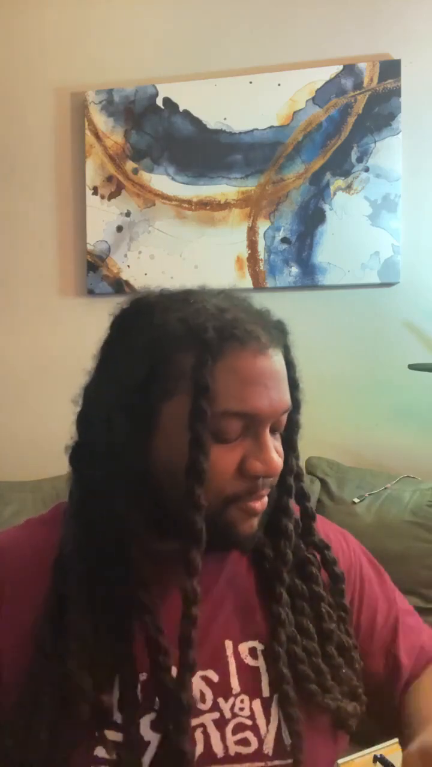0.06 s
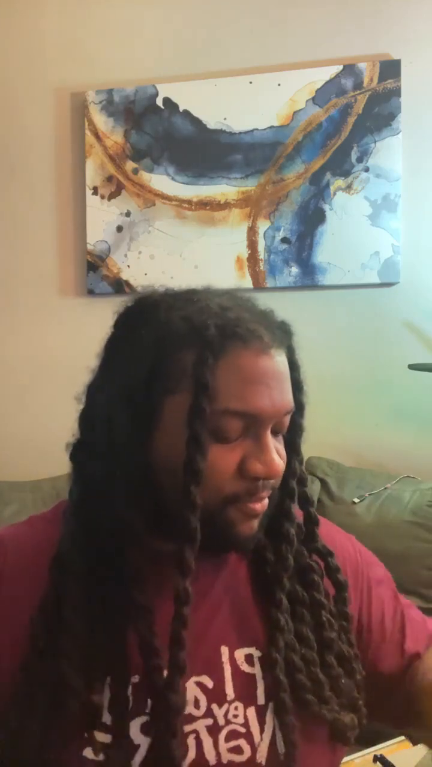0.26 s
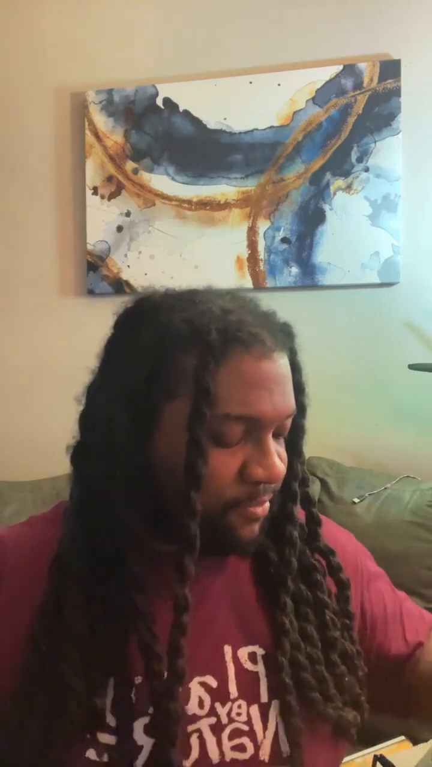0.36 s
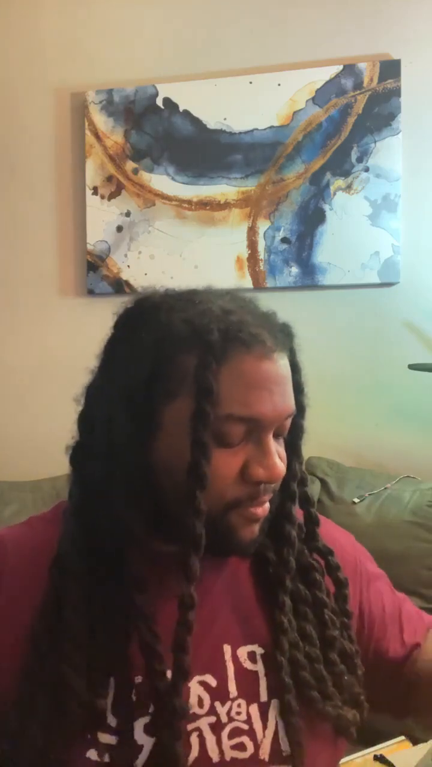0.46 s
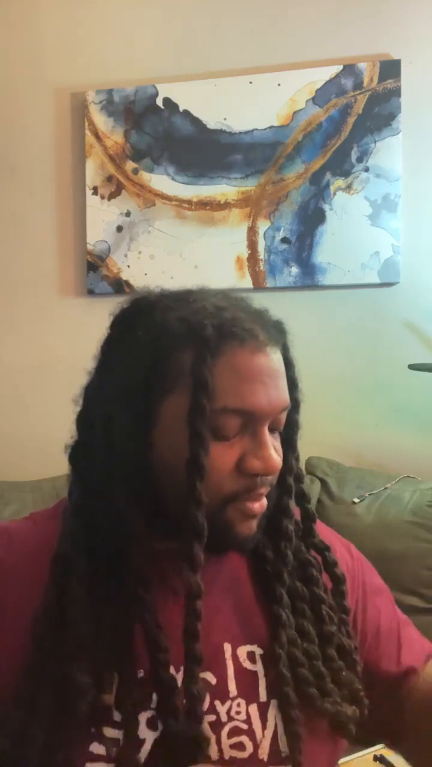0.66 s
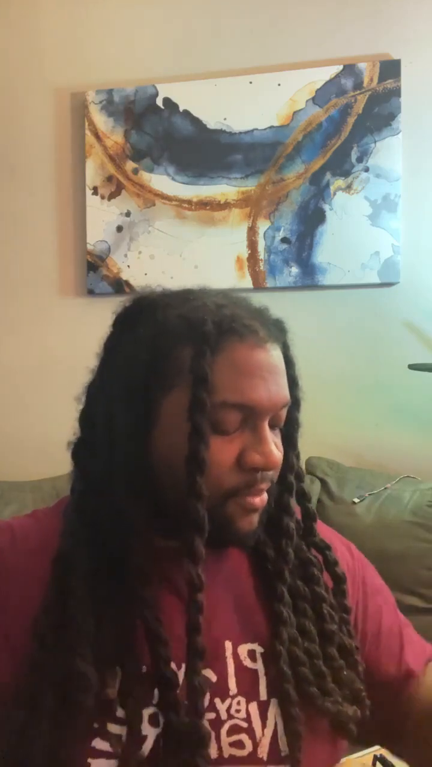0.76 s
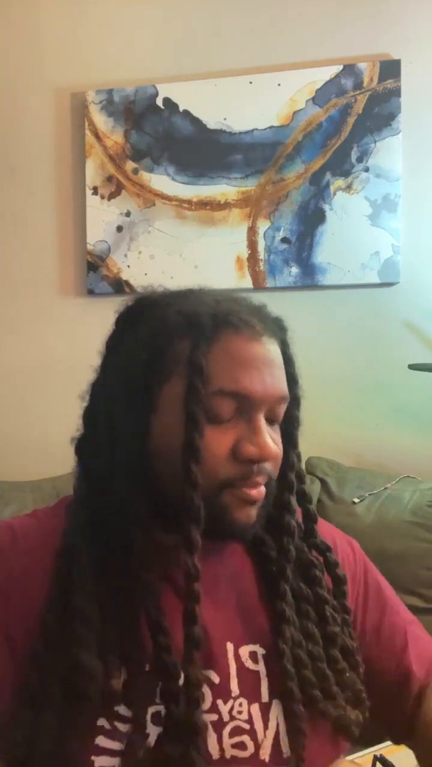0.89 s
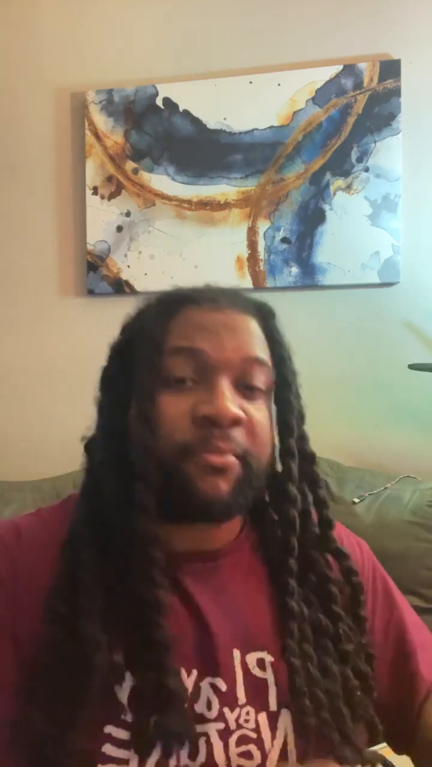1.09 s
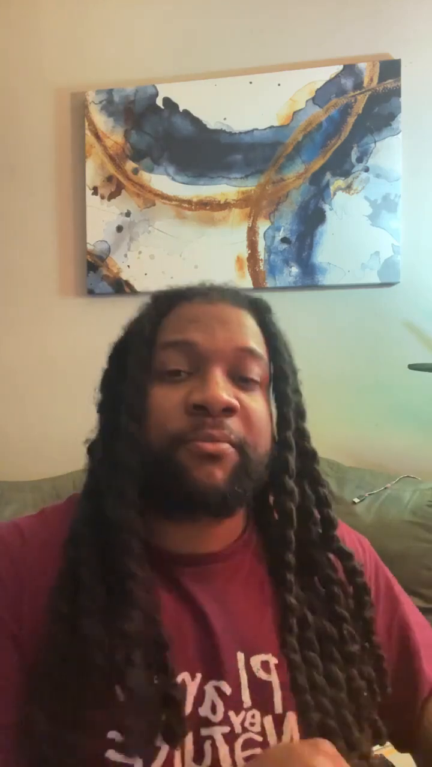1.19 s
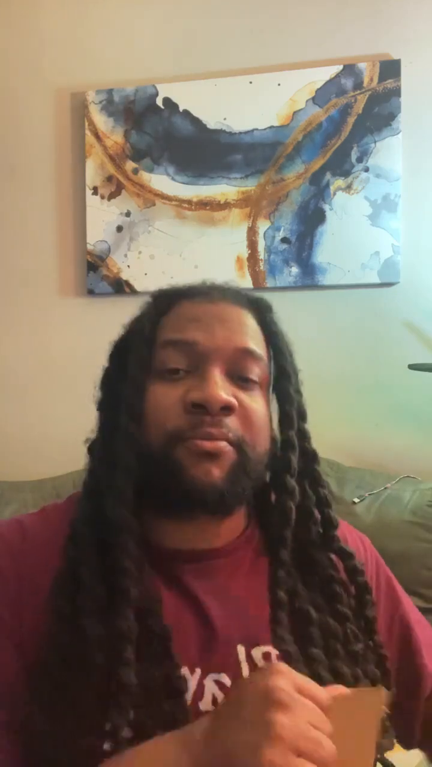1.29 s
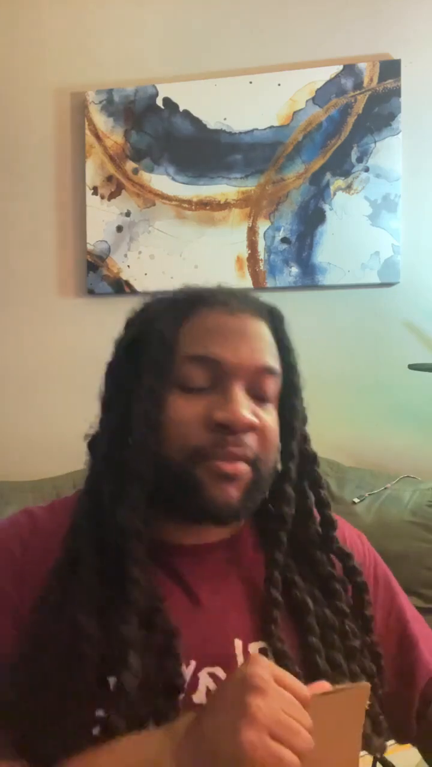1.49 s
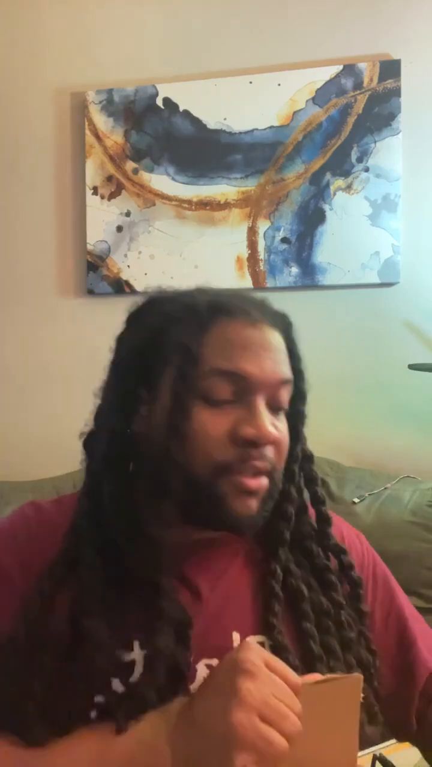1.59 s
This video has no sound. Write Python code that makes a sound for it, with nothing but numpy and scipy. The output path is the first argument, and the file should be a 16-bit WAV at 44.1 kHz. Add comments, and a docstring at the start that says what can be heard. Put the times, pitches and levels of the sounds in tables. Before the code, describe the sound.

Close, dry sound of hands opening a cardboard box in a quiet room: an early loud snap and hollow thump, lighter rubbing and ticks, another thump midway, then dense cracking ending in a short rip that fades.

```python
"""A cardboard box is pulled open by hand, close by, in a small furnished room with faint room tone.
Sliding over the board (gritty noise, smooth thrum) runs throughout. At 0.21 s the first fibres and
glue crack (spark clusters ringing the board) and a jolt thumps the hollow box (a pushed panel).
Sparser slides, cracks and jolts follow, with a thump at 0.85 s; cracks crowd from 1.0 s, a rip comes
at 1.43 s, then the sliding fades. Cracks and jolts leave a diffuse tail in the room."""
import sys
import numpy as np
from scipy import signal
from scipy.fft import rfft, irfft, next_fast_len
from scipy.io import wavfile
from scipy.ndimage import uniform_filter1d, map_coordinates

SR = 44100
rng = np.random.default_rng(int(sys.argv[2]) if len(sys.argv) > 2 else 0)


def unload_wav(signal):
    """Save mono or channel-first audio to the path in sys.argv[1] as 16-bit WAV at rate SR, clipped to [-1, 1]."""
    wavfile.write(
        sys.argv[1],
        SR,
        np.round(np.clip(np.atleast_2d(signal).T, -1, 1) * 32767).astype(np.int16),
    )


N = 72765

# room tone spectrum: (frequency [Hz], relative level [dB])
ROOM_TONE = [(24, -44), (40, -24), (387, 13), (577, 6), (670, 9), (1350, -12), (1560, 6), (1730, -26),
             (2160, -38), (15500, -21)]
# sliding over the board: (time [s], hiss [dB], treble fizz [dB], box rumble [dB], low thrum [dB])
SLIDE = [(0, -52, -47.5, -51.5, -58.5), (0.095, -55, -51, -59, -63), (0.118, -43.5, -37, -47.5, -54),
         (0.172, -39, -35, -40.5, -43.5), (0.2, -46, -40.5, -43, -42), (0.21, -31, -42, -65, -42),
         (0.217, -26.5, -38, -65, -58), (0.24, -32, -36, -42.5, -41), (0.255, -36, -41, -30.5, -45),
         (0.3, -41.5, -52, -46, -68), (0.345, -49, -53, -53, -57), (0.39, -42, -43.5, -52.5, -60),
         (0.419, -39, -38, -47, -46), (0.469, -34.5, -31.5, -35, -55), (0.485, -37, -44, -40, -69),
         (0.498, -43, -43.5, -41.5, -63), (0.604, -55.5, -55, -56, -53.5), (0.652, -48.5, -45, -45, -62),
         (0.72, -43, -40.5, -55, -55), (0.777, -41, -33.5, -44, -46), (0.828, -45.5, -46, -51.5, -68),
         (0.844, -37.5, -38.5, -32, -47), (0.858, -45, -53, -34.5, -47), (0.885, -47.5, -47, -41.5, -40.5),
         (0.99, -49, -43.5, -50.5, -68), (1.03, -44, -45, -53.5, -59), (1.081, -36, -35, -41, -55),
         (1.137, -45, -47, -49.5, -45.5), (1.189, -34.5, -40.5, -42.5, -50), (1.24, -44, -36, -51.5, -51),
         (1.265, -37, -37, -43, -61), (1.291, -29, -36, -38.5, -56), (1.325, -35.5, -36, -35, -50),
         (1.365, -33.5, -35.5, -46, -46), (1.4, -45, -47, -47, -52), (1.423, -43, -73, -49, -59),
         (1.426, -16.5, -42, -49, -55), (1.432, -23.5, -36, -25.5, -45), (1.454, -28.5, -30, -32.5, -46),
         (1.471, -35.5, -36, -39.5, -40), (1.519, -45, -50, -54, -59), (1.65, -54, -62, -56.5, -58)]
# spectrum of the friction hiss: (frequency [Hz], relative level [dB])
HISS = [(290, -2.5), (500, -9.5), (800, 0), (1100, -3.5), (1500, 0.5), (2500, 1.5), (4200, 1.5), (6000, 0),
        (8000, -2), (10400, -20), (17600, -66)]
# spectrum of the treble fizz and of a crack's spray: (frequency [Hz], gain [dB])
FIZZ = [(5000, -36), (8000, -7.5), (11000, -3), (15000, -1)]
# resonances of the hollow box: (frequency [Hz], width [Hz], relative gain [dB])
BOX_MODES = [(65.6, 27, -13), (144.3, 58, 3), (230, 163, -5), (361, 14.5, 1.5), (426, 6.1, -12),
             (476.7, 13, -3.5), (571, 14, -14), (900, 26, -17), (1307, 320, -12)]
# low thrum of the whole box: (frequency [Hz], width [Hz])
THRUM = (64.6, 39)
# cracks of fibre and glue: (mid time [s], relative level [dB], pitch [Hz], treble spray re ring [dB],
# base length [ms])
CRACKS = [(0.2125, -9, 3580, -25, 0.42), (0.2128, -13, 1300, -30, .8), (0.2263, -24, 4080, -18, 2.3),
          (0.2362, -22, 3270, -17, 0.94), (0.2451, -13.5, 3960, -19, 0.59), (.246, -18, 1720, -28, 1.3),
          (0.417, -25, 6500, -24, 1.6), (0.4586, -28, 7540, -7, 2), (0.4637, -27, 2460, 5.5, 3.6),
          (0.476, -24, 2860, 9, 0.8), (0.8468, -31, 1490, -1, 3.1), (0.8722, -22.5, 4860, -3, 0.85),
          (0.8918, -27, 4230, -6, 0.95), (1.002, -29.5, 1960, -10, 0.86), (1.004, -26, 7000, -12, 1.6),
          (1.005, -32.5, 2600, -22, 1.6), (1.036, -26, 2900, 0, 1.2), (1.056, -31, 4000, -14, 0.65),
          (1.0758, -21, 3140, -17, 0.37), (1.118, -31, 3780, -10, 0.63), (1.1226, -26.5, 3400, -21, 1.1),
          (1.1508, -19, 3500, -27, 0.12), (1.171, -22, 3700, -26, 1.3), (1.1811, -16, 4400, -28, 0.64),
          (1.18, -13.5, 2580, -32, 1.07), (1.1994, -24.5, 4970, -17, 6.9), (1.2154, -12.5, 2500, -20, 0.15),
          (1.227, -25, 5800, -9, 4.3), (1.228, -17.5, 2900, -15, 2), (1.2507, -28, 5770, -3, 1.9),
          (1.259, -23, 3470, 2, 1.26), (1.2633, -23, 4030, -3, 1.7), (1.279, -10.5, 2200, -16, 1.04),
          (1.284, -13.5, 3800, -2, 1.6), (1.2946, -22, 3000, -14, 1.6), (1.302, -18.5, 3930, -20, 1.4),
          (1.3094, -12, 3800, -20, 1.5), (1.312, -12, 4330, -18, 0.7), (1.3116, -13.5, 1550, -25, .8),
          (1.335, -13.5, 3130, -16, .8), (1.3368, -13.5, 1780, -27, 1), (1.351, -11, 2730, -8, 0.71),
          (1.3746, -23, 6200, -12, 0.6), (1.376, -28.5, 950, -30, 1.8), (1.4258, -17, 2270, 7.5, 1.7),
          (1.427, -12.5, 5630, -12, 2.4), (1.44, -17, 1400, -1, 3.75), (1.4564, -23, 7740, -4, 0.46)]
# resonances of the board: (frequency [Hz], width [Hz], relative gain [dB])
BOARD_MODES = [(1350, 300, -9), (1850, 350, -7), (2560, 400, -2), (3800, 700, -4), (4350, 700, -3),
               (5300, 800, -5), (7800, 1200, -8)]
# jolts of the box: (time [s], relative level [dB], panel pitch [Hz], box gain below about 210 Hz [dB],
# Q of the pop)
JOLTS = [(0.2138, -5, 310, -4.5, 0.79), (0.247, -26, 414, -4, 2), (.262, -28.5, 330, -6, 4.4),
         (.277, -34, 488, -10, 4.8), (0.28, -36, 336, -1, 4.5), (.301, -37, 373, -10, 2.6),
         (0.321, -44, 377, -12, 2.6), (.36, -38, 385, -15, 4.5), (0.463, -35, 135, -12, 1.7),
         (0.489, -34, 433, 9, 0.67), (0.518, -45, 350, 15, 1), (0.8491, -17, 269, 4, .7),
         (.851, -34.5, 553, -10, 3), (1.15, -33.5, 373, -15, 1), (1.229, -27.5, 334, 1, 1.04),
         (1.264, -33.5, 776, -10, 3.9), (1.266, -39, 278, -4, 2.2), (1.28, -21.5, 540, -26, 1.38),
         (1.289, -31, 231, 0, 3.9), (1.3105, -19, 417, -2, 1.26), (1.316, -30, 114, -17, 1.25),
         (1.337, -20.5, 800, 5, 1), (1.349, -30, 276, -1.5, 1.9), (1.353, -31.5, 585, -10, 2.2),
         (1.4279, -20.5, 487, -17, 2.4), (1.4261, -25, 245, -25, 1.9), (1.437, -25, 960, -14, 3.5),
         (1.454, -29, 320, 0, 2.3)]
# air in the box, colouring the tail of a jolt: (frequency [Hz], width [Hz])
HOLLOW = (437, 420)
# decay of the room: (frequency [Hz], T60 [s])
ROOM_T60 = [(100, 0.11), (400, 0.51), (2000, 0.48), (8000, 0.054), (15000, 0.37)]

ROOM_TONE_DB = -58.5
GRAINS_PER_S, GRAIN_SCATTER_DB, GRAIN_POWER_SHARE, PATCH_DB = 3000, 4, 0.27, 2
CLUMPS_PER_S, CLUMP_DB = 180, 1.5  # friction catches and lets go
SPARKS_PER_MS, SPARK_SCATTER_DB = 3.5, 5
CRACK_RISE, CRACK_FALL, SPRAY_FALL = 0.3, 0.95, 5.1  # in base lengths
CRACK_Q, CRACK_LOW_CUT = 1.5, 0.42  # low cut as a share of the crack's pitch
BOARD_DB = -16  # board modes against the crack's own pitch
BOARD_DELAY_MS, BOX_DELAY_MS = 0.9, 0.35  # at about 1 kHz
DELAY_POWER = 1.2  # delay grows as period to this power
CONTACT_PERIODS = 0.5  # push on the panel, in panel periods
BOX_DB = -4.5  # box gain under the pop
CRACK_ROOM_DB, JOLT_ROOM_DB = -15, -12
TOP_HZ = 15800


def amp(db):
    """Amplitude factor of a level in dB."""
    return 10 ** (np.asarray(db) / 20)


def unit(x):
    """x scaled to an RMS of 1."""
    return x / np.sqrt(np.mean(x ** 2) + 1e-20)


def along(points, hz):
    """(Hz, value) points interpolated on a log frequency axis."""
    f, values = np.transpose(points)
    return np.interp(np.log(hz + 1), np.log(f + 1), values)


def filtered(x, response):
    """x shaped by a complex response of frequency."""
    size = next_fast_len(len(x) + SR // 2)
    return irfft(rfft(x, size) * response(np.fft.rfftfreq(size, 1 / SR)), size)[:len(x)]


def peak(f, hz, width_hz):
    """One causal resonance."""
    return 1j * f * width_hz / (hz * hz - f * f + 1j * f * width_hz)


def modes(f, table):
    """A body with several resonances, alternating in sign."""
    return sum((-1) ** k * amp(db) * peak(f, hz, width_hz)
               for k, (hz, width_hz, db) in enumerate(table))


def late(f, delay_ms):
    """Dispersion: the lower the frequency, the later it arrives."""
    p = DELAY_POWER
    return np.exp(2j * np.pi * delay_ms * ((f + 15) / 1000) ** (1 - p) / (p - 1))


def room_tone():
    """Steady noise with the spectrum of the quiet room."""
    noise = rng.standard_normal(N)
    return amp(ROOM_TONE_DB) * unit(filtered(noise, lambda f: amp(along(ROOM_TONE, f))))


def gritty(count):
    """Friction grit: noise mixed with random single clicks, its gain patchy over time and frequency."""
    sizes = amp(GRAIN_SCATTER_DB * rng.standard_normal(count))
    clicks = (rng.random(count) < GRAINS_PER_S / SR) * sizes * rng.choice([-1, 1], count)
    smooth = np.sqrt(1 - GRAIN_POWER_SHARE) * rng.standard_normal(count)
    x = np.sqrt(GRAIN_POWER_SHARE) * unit(clicks) + smooth
    z = signal.stft(x, nperseg=256)[2]
    patches = uniform_filter1d(uniform_filter1d(rng.standard_normal(z.shape), 8, 0), 4, 1)
    return signal.istft(z * amp(PATCH_DB * unit(patches)), nperseg=256)[1][:count]


def sliding():
    """One gritty friction drives hiss, treble fizz and box rumble; a smooth drag drives the thrum."""
    time_s, *levels_db = np.transpose(SLIDE)
    clumps = map_coordinates(rng.standard_normal(N // 64), [np.arange(N) * CLUMPS_PER_S / SR])
    grit = gritty(N) * amp(CLUMP_DB * clumps)
    drag = rng.standard_normal(N)
    layers = [(grit, lambda f: amp(along(HISS, f))),
              (grit, lambda f: amp(along(FIZZ, f))),
              (grit, lambda f: modes(f, BOX_MODES) * peak(f, 348, 320)),
              (drag, lambda f: peak(f, *THRUM) ** 2)]
    out = np.zeros(N)
    for level_db, (source, colour) in zip(levels_db, layers):
        gain = amp(np.interp(np.arange(N) / SR, time_s, level_db))
        out += gain * unit(filtered(source, colour))
    return out


def cracks():
    """Each crack is a cluster of sparks ringing the board, most at its own pitch, with a treble spray."""
    out = np.zeros(N + 2048)
    t_ms = np.arange(-256, 1792) / SR * 1000
    count = len(t_ms)
    for time_s, db, hz, treble_db, length_ms in CRACKS:
        u = (t_ms + length_ms / 2) / length_ms  # peak half a base length ahead of mid time

        def shape(fall):
            """Fast rise, slower fall."""
            return np.where(u < 0, np.exp(-(u / CRACK_RISE) ** 2), np.exp(-np.abs(u / fall) ** 0.75))

        def board(f):
            """Own pitch over the board modes, low cut, dispersed."""
            low_cut = (f / (f - 1j * CRACK_LOW_CUT * hz)) ** 2
            body = peak(f, hz, hz / CRACK_Q) + amp(BOARD_DB) * modes(f, BOARD_MODES)
            return late(f, BOARD_DELAY_MS) * low_cut * body

        sizes = amp(SPARK_SCATTER_DB * rng.standard_normal(count))
        sparks = (rng.random(count) < SPARKS_PER_MS * 1000 / SR) * sizes
        sparks[np.argmin(np.abs(u))] = 1  # always one at the peak
        burst = sparks * rng.choice([-1, 1], count) + 0.15 * rng.standard_normal(count)
        ring = filtered(burst * shape(CRACK_FALL), board)
        ring /= np.sqrt(uniform_filter1d(ring ** 2, 30).max())  # loudest 30-sample RMS to 1
        spray = filtered(rng.standard_normal(count) * shape(SPRAY_FALL), lambda f: amp(along(FIZZ, f)))
        crack = ring + amp(treble_db) * spray
        out[round(time_s * SR) - 256:][:count] += amp(db) * crack / np.sqrt(2)
    return out[:N]


def jolts():
    """A panel pops, always the same way, in a cycle or two and sets the hollow box ringing."""
    out = np.zeros(N + SR // 2)
    t = np.arange(SR // 2) / SR
    for time_s, db, hz, depth_db, q in JOLTS:
        push = -q * np.sin(np.pi * np.clip(t * hz / CONTACT_PERIODS, 0, 1)) ** 2

        def panel_and_box(f):
            """Pop of the panel plus the dispersed box, its bass set by the depth."""
            bass = 1 + (amp(depth_db) - 1) / (1 + (f / 210) ** 4)
            hollow_box = bass * modes(f, BOX_MODES) * late(f, BOX_DELAY_MS)
            return peak(f, hz, hz / q) ** 2 + amp(BOX_DB) / q * hollow_box  # /q undoes q in the push

        ring = filtered(push, panel_and_box)
        start = round(time_s * SR)
        out[start:][:len(t)] += 3 * amp(db) * ring[:len(out) - start]
    return out[:N]


def room(x, count=6):
    """Each stretch of sound gets its own diffuse tail, each frequency dying at its own speed."""
    out = np.zeros(N)
    edges = np.linspace(0, N, count + 1).astype(int)
    for a, b in zip(edges, edges[1:]):
        hz, t, z = signal.stft(rng.standard_normal(SR // 2), SR, nperseg=256)
        decay = amp(-60 * t / along(ROOM_T60, hz)[:, None])
        tail = signal.istft(z * decay, SR, nperseg=256)[1]
        delayed = np.pad(x[a:b], (200, 0))  # 200 samples
        wet = signal.fftconvolve(delayed, tail / np.linalg.norm(tail))[:N - a]
        out[a:a + len(wet)] += wet
    return out


def scene():
    """Sum of room tone, sliding, cracks, jolts and the tail of cracks and jolts."""
    snap, thump = cracks(), jolts()
    hollow = filtered(thump, lambda f: peak(f, *HOLLOW) ** 2)
    tail = room(amp(CRACK_ROOM_DB) * snap + amp(JOLT_ROOM_DB) * hollow)
    return (room_tone() + sliding() + snap + thump + tail)[None]


def record(dry):
    """Nothing sounds above TOP_HZ."""
    return filtered(dry[0], lambda hz: hz < TOP_HZ)[None]


dry = scene()
out = record(dry)
unload_wav(out)
```